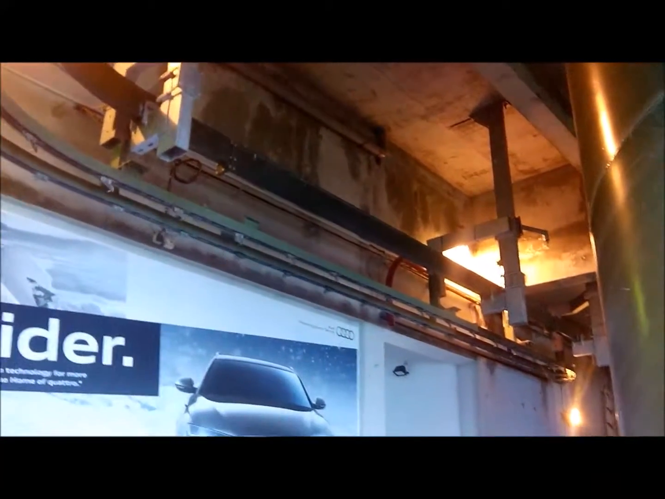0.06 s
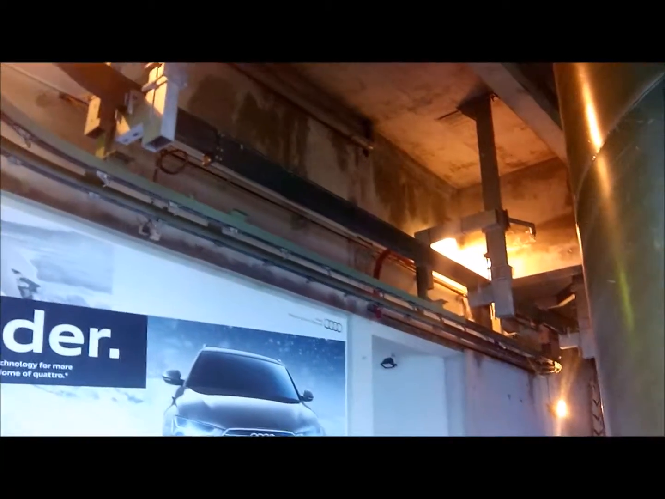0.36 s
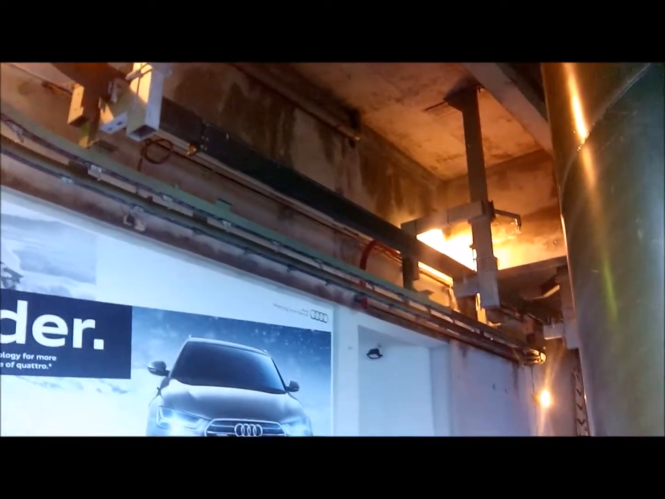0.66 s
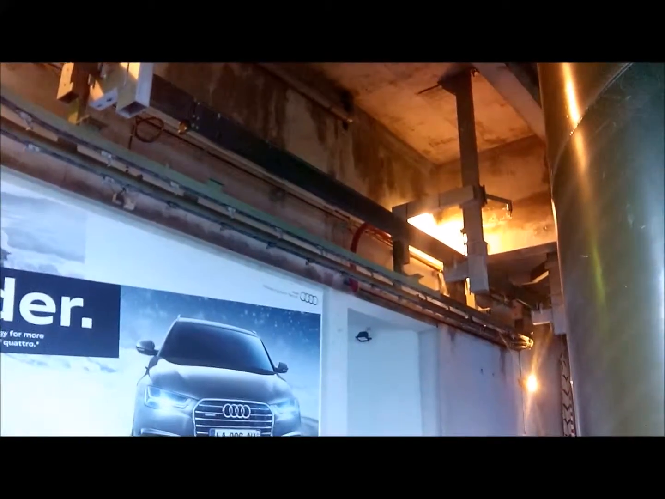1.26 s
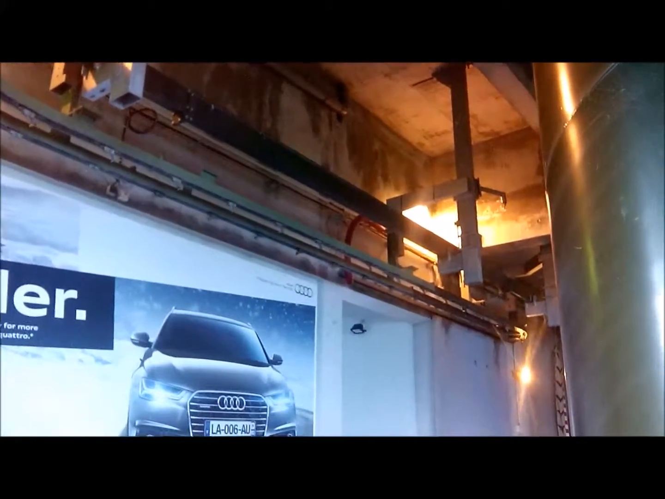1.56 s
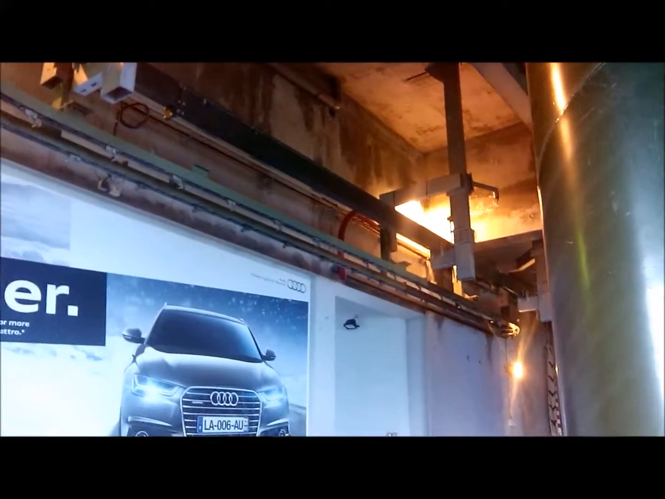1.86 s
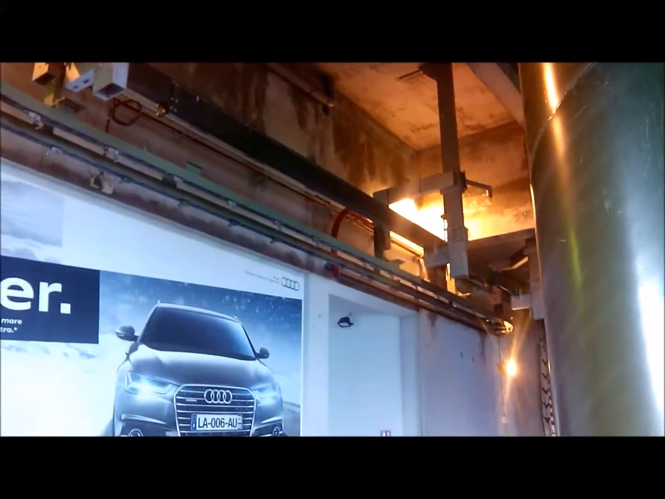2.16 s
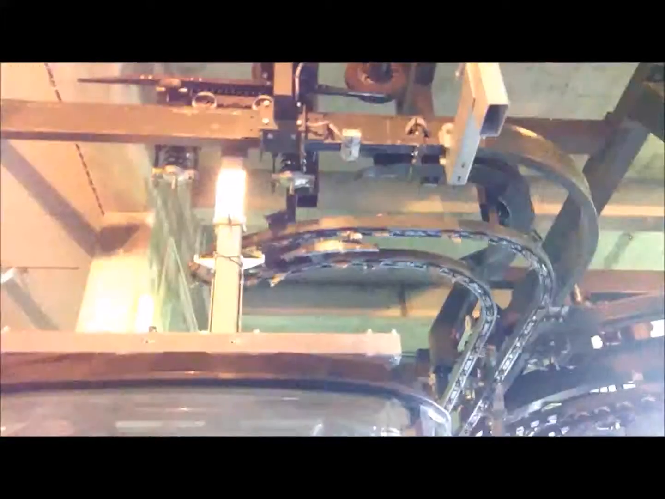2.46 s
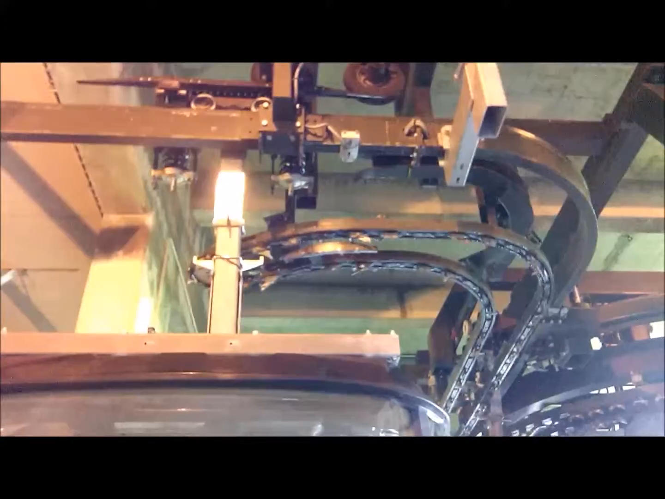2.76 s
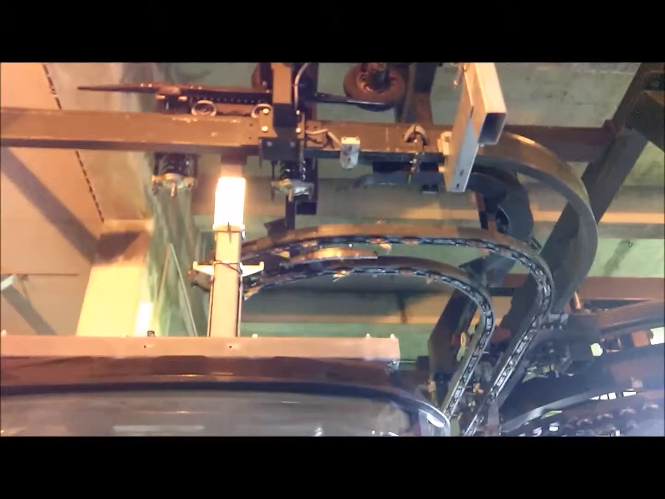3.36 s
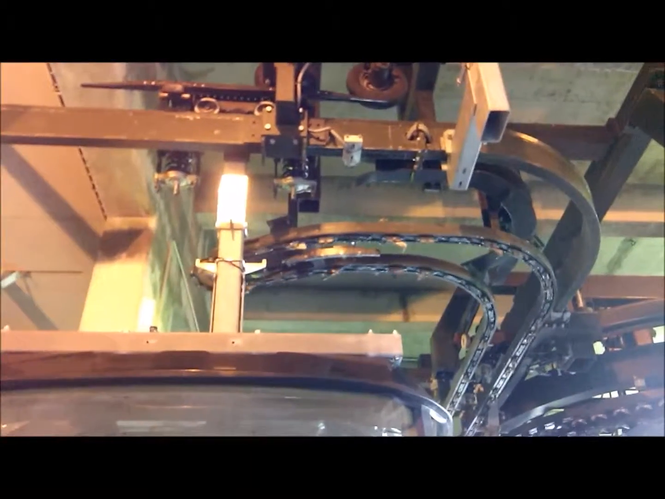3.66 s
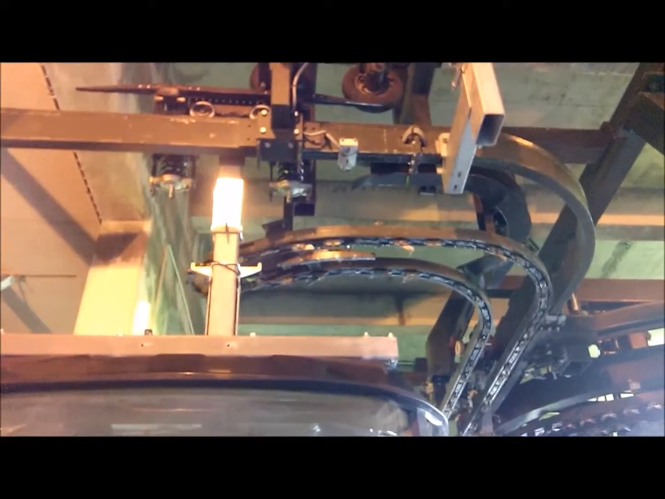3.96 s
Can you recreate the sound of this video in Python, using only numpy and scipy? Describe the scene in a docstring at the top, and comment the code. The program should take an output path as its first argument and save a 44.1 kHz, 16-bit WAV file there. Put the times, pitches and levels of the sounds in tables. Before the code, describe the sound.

Cable lift machinery hums and whines with metal clinks, then drones louder up close.

```python
"""Cable lift machinery in a concrete station, heard from two places.
First the hall: a gearbox whines over motor hum, rumbling rollers and the hiss of the running cable.
Metal clinks, squeaks and rattles; one dull knock at 1.8 s. At 2.4 s, a short silence.
From 2.5 s, close to the drive: a loud throbbing drone on the orders of its shaft,
the same whine, and thin bright ticks."""
import sys
import numpy as np
from scipy import signal
from scipy.fft import rfft, irfft
from scipy.io import wavfile

SR = 44100
rng = np.random.default_rng(int(sys.argv[2]) if len(sys.argv) > 2 else 0)


def dump_mix(stems):
    """Bounce the given channels to the path in sys.argv[1] as a 16-bit WAV at rate SR."""
    frames = np.atleast_2d(stems).T  # one column per channel
    limited = np.clip(frames, -1, 1)  # hard clip at full scale
    pcm = np.round(limited * 32767).astype(np.int16)
    wavfile.write(sys.argv[1], SR, pcm)


N = 176400
T = np.arange(N) / SR

HALL_END_S, HALL_FADE_S, DRIVE_START_S = 2.416, .012, 2.5155
SHAFT_HZ, PUSHES_PER_TURN = 14.585, 6
MESH_HZ, SLOW_SHAFT_HZ, FAST_SHAFT_HZ = 696.3, 8.8, 25.0
METAL_PAN_DB = -5.5  # pan: left minus right

# drone partials: shaft_order, level_db
DRONE_ORDERS = [(5, -25.5), (6, -12.7), (11, -26), (12, -21.5), (13, -23), (15, -35), (17, -33), (18, -30),
                (23, -39), (26, -43)]
# swell of the drone and of its octave: time_s, gain_db
DRONE_GAIN_DB = [(2.52, 0), (2.75, -.7), (3, -1), (3.4, .6), (4, 1.2)]
OCTAVE_GAIN_DB = [(2.52, 5), (2.95, 2.5), (3.2, -4), (4, -1)]
# tooth tone and sidebands: slow_shaft_steps, fast_shaft_steps, hall_db, drive_db
WHINE_LINES = [(0, 0, -37.5, -40), (-1, 0, -46, -46), (1, 0, -51, -46), (2, 0, -49, -53),
               (0, -1, -45, -39.5), (0, 1, -54, -42)]
# swell of the tooth tone: time_s, gain_db
TOOTH_GAIN_DB = [(0, 2), (.12, 4), (.35, -5), (.75, 2), (1.15, -4), (1.55, 4.5), (1.9, 1.5), (2.15, 0),
                 (2.36, 8), (2.52, -10), (4, 1)]
# motor and bearing hums: pitch_hz, hall_db, drive_db, pan_db
HUM_LINES = [(160, -41, -45, 0), (283, -39, -46, -2), (300, -40.5, -47, -2), (398, -51, -52, 0),
             (573, -53, -50, -3), (838, -52, -58, -4), (953, -61, -55, 0), (1044, -54, -55, 0),
             (1070, -57, -60, -2), (1085, -58, -62, -2), (1269, -52, -54, 2), (1367, -55, -59, -3),
             (1418, -59, -62, -2), (1657, -54, -58, -1), (1666, -52, -56, -1), (2509, -57.5, -62, -1)]
# metal impacts: start_s, level_db, tail_gain_db, pitch_hz
CLINK_HITS = [(.068, -39.5, -16, 5200), (.177, -29, -4.5, 6170), (.54, -40, -11, 6000),
              (0.6272, -34.5, -20, 5200), (0.788, -37.5, -19, 5200), (0.908, -34, -12, 4960),
              (1.013, -34, -12.5, 4100), (1.112, -35.5, -14, 4830), (1.282, -38, -4, 5300),
              (1.488, -34.5, -10.5, 4600), (1.954, -41, -8, 5200), (2.022, -41, -11, 4400),
              (2.145, -36.5, -17, 4200), (2.831, -37, -5, 6200), (2.861, -33, -12, 5400)]
# spectrum of clinks and rattles: freq_hz, gain_db
METAL_SPECTRUM = [(1200, -8), (2600, 4), (3500, 3.5), (5500, 8.5), (7500, -7), (10000, -15), (15000, -22)]
# modes of the struck metal: pitch_hz, gain_db, t60_s
CLINK_MODES = [(2630, 7, .6), (2530, -13, 0.78), (2676, -4, .45), (3430, -4.5, 0.17), (3550, -1, .35),
               (4856, 0, 0.32), (5440, -15, 0.45), (5180, -3, .5), (5830, -20, 0.6)]
# light contacts: start_s, gain_db, tail_gain_db, pan_db
TICK_HITS = [(.072, -45, -6, 0), (.493, -42, -10, 5), (.78, -51, -7, 0), (1.02, -51, -8, 0),
             (1.275, -55, -8, -5), (1.48, -51, -8, 0), (2.614, -32.5, -5, 10), (2.628, -32, -10, 4),
             (2.831, -46, 6, 8), (2.858, -41, 1, 7), (2.9, -42, 0, 5), (3.052, -38, -8, 6),
             (3.066, -38, -6, 4), (3.383, -35, -16, 2), (3.519, -40.5, -3, 5), (3.55, -44, -7, 4),
             (3.738, -41, -14, 4), (3.88, -48, 5, 6), (3.961, -36, -9, 7), (3.977, -38, -2, 4)]
# tick spectrum: freq_hz, gain_db
TICK_SPECTRUM = [(4000, -31), (7000, -6), (9500, -5), (11500, 2.5), (13000, 3), (15500, -6)]
# running gear squeaks: start_s, length_s, level_db, pitch_hz
SQUEAK_RUBS = [(0.183, .04, -40.5, 5170), (0.192, 0.11, -39.5, 2480), (0.296, .03, -42, 5350),
               (.535, 0.035, -45, 4180), (0.566, 0.04, -37.5, 4100), (0.655, .16, -49, 4060),
               (.895, 0.061, -44, 4950), (0.902, 0.037, -40, 2100), (0.985, .06, -45, 5050),
               (1.31, .05, -49, 5700), (1.465, .06, -43.5, 4800), (1.57, .04, -52, 10950)]
# rattle envelope: time_s, gain_db
RATTLE_GAIN_DB = [(0, -55), (.6, -47), (1, -51), (1.5, -48.5), (1.75, -48.5), (2.4, -57), (2.55, -39.5),
                  (2.9, -42), (4, -45.5)]
# roller rumble and cable hiss: freq_hz, density_db
HALL_SPECTRUM = [(25, -83), (48, -72.5), (70, -60), (105, -53), (155, -52), (205, -60.5), (330, -62.5),
                 (450, -67), (570, -61), (700, -64), (780, -69), (980, -71.5), (1170, -76), (1380, -71),
                 (1530, -77), (2100, -72), (2550, -71.5), (3050, -78.5), (4200, -75.5), (5500, -82),
                 (7000, -94.5), (9000, -93), (11000, -92), (15500, -98.5)]
DRIVE_SPECTRUM = [(25, -65), (48, -57), (66, -58), (95, -36.5), (122, -45), (170, -39.5), (220, -48.5),
                  (265, -43), (320, -54.5), (450, -56.5), (600, -61.5), (700, -53.5), (780, -68.5),
                  (1100, -69), (1500, -69.5), (2400, -65.5), (4000, -69), (5400, -70.5), (7000, -85),
                  (9000, -86.5), (10200, -86.5), (11100, -83.5), (12000, -89.5), (15500, -98)]
# balance of rumble and hiss: freq_hz, pan_db
HALL_PAN_DB = [(100, 0.5), (380, 1), (700, -1.5), (2400, -1), (4400, -4), (8000, 0), (15000, 2.5)]
DRIVE_PAN_DB = [(100, 2.5), (380, -0.5), (2400, -0.5), (4400, -1.5), (8000, -2.5), (15000, 9.5)]
# swell of the cable hiss: time_s, gain_db
HALL_HISS_DB = [(0, 0), (.6, .5), (1.05, 1), (1.5, .5), (1.85, -1.5), (2.25, -2.5), (2.4, 3.5)]
DRIVE_HISS_DB = [(2.52, -0.5), (2.8, -1), (2.88, 2.5), (3.08, 0), (3.45, -1.5), (3.58, 0.5), (3.68, -3.5),
                 (3.8, -0.5), (4, -2.5)]
# stereo width: freq_hz, side_minus_mid_db
WIDTH_DB = [(60, -26), (110, -53.5), (200, -15), (380, -19.5), (700, -9.5), (1290, -6.5), (2380, -9),
            (4400, -0.5), (8120, 10), (15000, 1.5)]


def drive_drone(wow_ratio=.0012, waver_db=.9):
    """Six pushes per turn make the drone; their unevenness adds other shaft orders, so it throbs."""
    turns = np.cumsum(SHAFT_HZ * (1 + wow_ratio * walk(.75))) / SR
    turns -= np.interp(DRIVE_START_S, T, turns)
    out = 0
    for order, db in DRONE_ORDERS:
        phase_cycles = rng.random() * (order % PUSHES_PER_TURN > 0)  # push harmonics stay in phase
        level_db = db + waver_db * walk(7)
        if order == 2 * PUSHES_PER_TURN:
            level_db += over_time(OCTAVE_GAIN_DB)
        out -= np.sqrt(2) * undb(level_db) * np.cos(2 * np.pi * (order * turns + phase_cycles))
    return out * undb(over_time(DRONE_GAIN_DB))


def gearbox_whine(in_hall, at_drive):
    """The tooth tone beats with its shaft sidebands."""
    out = 0
    for slow, fast, hall_db, drive_db in WHINE_LINES:
        offset_hz = slow * SLOW_SHAFT_HZ + fast * FAST_SHAFT_HZ
        swell = undb(over_time(TOOTH_GAIN_DB)) if offset_hz == 0 else 1
        gain = undb(hall_db) * in_hall + undb(drive_db) * at_drive
        out += swell * gain * tone(MESH_HZ + offset_hz, rough=.22, waver_hz=5.4)
    return out * pan(3)


def motor_hums(in_hall, at_drive):
    """Motors and bearings hum on wavering lines."""
    out = 0
    for hz, hall_db, drive_db, pan_db in HUM_LINES:
        gain = undb(hall_db) * in_hall + undb(drive_db) * at_drive
        out += gain * pan(pan_db) * tone(hz, rough=.6, waver_hz=6)
    return out


def clinks(blow_t60_s=.022, hall_t60_s=.77, detune_ratio=.00364):
    """Metal parts knock on the right: a pitched crack, ringing modes and the hall's tail."""
    out, t = np.zeros((2, N)), T[:SR // 2]
    for start_s, db, tail_db, hz in CLINK_HITS:
        pitched = coloured([(hz * .85, -50), (hz * .96, 0), (hz * 1.04, 0), (hz * 1.15, -50)], len(t))
        crack = coloured(METAL_SPECTRUM, len(t))
        blow = (undb(-10) * crack + undb(1) * pitched) * decay(t, blow_t60_s)
        tail = undb(tail_db) * coloured(METAL_SPECTRUM, len(t)) * decay(t, hall_t60_s)
        ring = 0
        for mode_hz, mode_db, t60_s in CLINK_MODES:
            detuned_hz = mode_hz * (1 + detune_ratio * rng.standard_normal())
            cycles = detuned_hz * t + rng.random((2, 1))
            ring += undb(mode_db) * decay(t, t60_s) * np.sin(2 * np.pi * cycles)
        add(out, start_s, undb(db) * pan(METAL_PAN_DB) * (blow + tail + undb(-11.5) * ring))
    return out


def ticks(t60_s=.072, tail_t60_s=.61, trim_db=-7.5):
    """Light, very bright contacts, each with a short sizzling tail."""
    out, t = np.zeros((2, N)), T[:SR // 2]
    for start_s, db, tail_db, pan_db in TICK_HITS:
        envelope = decay(t, t60_s) + undb(tail_db) * decay(t, tail_t60_s)
        add(out, start_s, undb(db + trim_db) * pan(pan_db) * coloured(TICK_SPECTRUM, len(t)) * envelope)
    return out


def squeaks(width_ratio=.021):
    """Running gear rubs: a narrow resonance swells and fades."""
    out, t = np.zeros((2, N)), T[:SR // 4]
    step = 1 + width_ratio
    for start_s, length_s, db, hz in SQUEAK_RUBS:
        peak = [(hz / step ** 10, -60), (hz / step, -9), (hz, 0), (hz * step, -9), (hz * step ** 10, -60)]
        envelope = np.sin(np.pi * np.minimum(t / length_s, 1))
        add(out, start_s, undb(db) * pan(METAL_PAN_DB) * coloured(peak, len(t)) * envelope)
    return out


def knock(start_s=1.805, level_db=-18, pitch_hz=670, t60_s=.035):
    """One dull knock in the machinery: a damped sine."""
    t = np.maximum(T - start_s, 0)
    attack = np.minimum(t * pitch_hz, 1)
    return undb(level_db) * np.sin(2 * np.pi * pitch_hz * t) * decay(t, t60_s) * attack


def rattles(rate_per_s=50, scatter_db=2.2, t60_s=.06):
    """Loose parts chatter at random, mostly too lightly to be told apart."""
    out, t = np.zeros((2, N)), T[:SR // 10]
    for when, size in rng.random((int(rate_per_s * N / SR), 2)):
        db = -scatter_db * np.log(max(1 - size, .03))
        add(out, when * N / SR, undb(db) * coloured(METAL_SPECTRUM, len(t)) * decay(t, t60_s))
    return out * undb(over_time(RATTLE_GAIN_DB)) * pan(METAL_PAN_DB)


def rollers_and_cable(spectrum, balance, hiss, rumble_flicker_db, hiss_flicker_db, shared_flicker_db):
    """Rolling noise in octave bands that flicker alone and together; the hiss follows its gain curve."""
    f = np.arange(N // 2 + 1) * SR / N
    mid, side = rfft(rng.standard_normal((2, N)))
    width = undb(curve(WIDTH_DB, f))
    ears = np.array([mid + width * side, mid - width * side]) / np.hypot(1, width)
    ears = ears * pan(curve(balance, f)) * undb(curve(spectrum, f)) * np.sqrt(SR / 2)
    shared_db = shared_flicker_db * walk(11)
    hiss_db, hiss_above_hz = over_time(hiss), 1700
    out = 0
    for hz in 20 * 2. ** np.arange(11):
        octaves_off = abs(np.log2((f + 1e-9) / hz))
        band = irfft(ears * np.clip(1 - octaves_off, 0, 1), N)
        flicker = walk(13)
        own_db = hiss_db + hiss_flicker_db * flicker if hz > hiss_above_hz else rumble_flicker_db * flicker
        out += band * undb(shared_db + own_db)
    return out


def tone(hz, rough, waver_hz):
    """Machine line: a steady part plus a wavering part scattered by the hall, unequal at each ear."""
    grid_s = np.arange(800) / 200
    noise = rng.standard_normal((2, len(grid_s))) + 1j * rng.standard_normal((2, len(grid_s)))
    lowpass = np.exp(-(np.fft.fftfreq(len(grid_s), grid_s[1]) / waver_hz) ** 2)
    scatter = np.fft.ifft(np.fft.fft(noise) * lowpass)
    mid, side = scatter / np.sqrt(np.mean(abs(scatter) ** 2))
    steady = np.exp(2j * np.pi * rng.random())
    mid = (steady + rough * mid) / np.hypot(1, rough)
    side = side * undb(curve(WIDTH_DB, hz)) / 2
    carrier = np.sqrt(2) * np.exp(2j * np.pi * hz * T)
    return np.array([(np.interp(T, grid_s, ear) * carrier).real for ear in (mid + side, mid - side)])


def walk(rate_hz):
    """Smooth random motion, spread 1."""
    grid_s = np.arange(1024) / 256
    f = np.fft.rfftfreq(len(grid_s), grid_s[1])
    lowpass = np.exp(-(f / rate_hz) ** 2) * (f > 0)
    motion = irfft(rfft(rng.standard_normal(len(grid_s))) * lowpass)
    return np.interp(T, grid_s, unit(motion))


def coloured(points, size):
    """Two independent noises shaped by (freq_hz, gain_db) points, rms 1."""
    f = np.arange(size // 2 + 1) * SR / size
    white = rfft(rng.standard_normal((2, size)))
    return unit(irfft(white * undb(curve(points, f)), size))


def undb(db):
    """Decibels to gain."""
    return 10 ** (np.asarray(db) / 20)


def unit(x):
    """Scale to rms 1."""
    return x / np.sqrt(np.mean(x ** 2))


def curve(points, hz):
    """Read (freq_hz, value) points on a log axis."""
    f, v = np.array(points, float).T
    return np.interp(np.log(hz + 1e-9), np.log(f), v)


def over_time(points):
    """Read (time_s, value) points at every sample."""
    return np.interp(T, *np.array(points).T)


def pan(db):
    """Stereo gains for left minus right in dB."""
    return undb(np.array([db, -db]).reshape(2, -1) / 2)


def decay(t, t60_s):
    """Fall by 60 dB in t60_s."""
    return np.exp(-np.log(1000) * t / t60_s)


def add(out, start_s, sound):
    """Mix a sound in at start_s."""
    i = int(start_s * SR)
    out[:, i:i + sound.shape[1]] += sound[:, :max(N - i, 0)]


def scene():
    """The hall, a short silence, then an abrupt start beside the drive."""
    in_hall = np.clip((HALL_END_S - T) / HALL_FADE_S, 0, 1)
    at_drive = 1. * (T >= DRIVE_START_S)
    hall_noise = rollers_and_cable(HALL_SPECTRUM, HALL_PAN_DB, HALL_HISS_DB,
                                   rumble_flicker_db=.9, hiss_flicker_db=.5, shared_flicker_db=.3)
    drive_noise = rollers_and_cable(DRIVE_SPECTRUM, DRIVE_PAN_DB, DRIVE_HISS_DB,
                                    rumble_flicker_db=-2, hiss_flicker_db=.2, shared_flicker_db=.05)
    drone = drive_drone()
    contacts = clinks() + ticks() + squeaks() + rattles() + knock()
    tones = gearbox_whine(in_hall, at_drive) + motor_hums(in_hall, at_drive)
    return in_hall * (hall_noise + contacts) + at_drive * (drone + drive_noise + contacts) + tones


def record(dry, ceiling=.92, cutoff_hz=15850):
    """Soft peak limiter, then a steep low-pass."""
    rounded = dry / (1 + (dry / ceiling) ** 8) ** (1 / 8)
    return signal.sosfilt(signal.ellip(10, .1, 80, cutoff_hz, fs=SR, output="sos"), rounded)


dry = scene()
out = record(dry)
dump_mix(out)
```